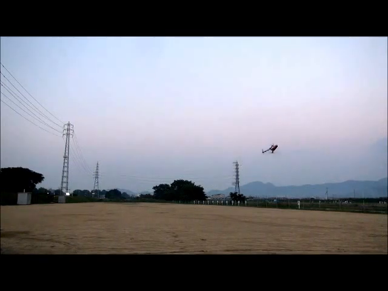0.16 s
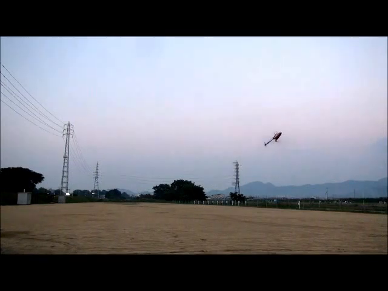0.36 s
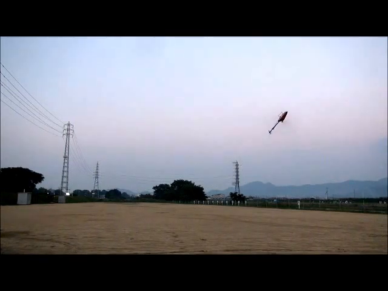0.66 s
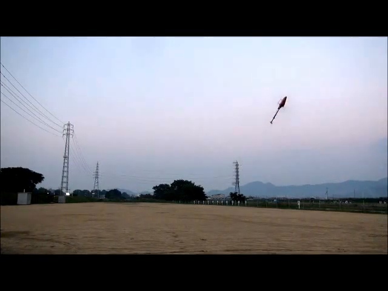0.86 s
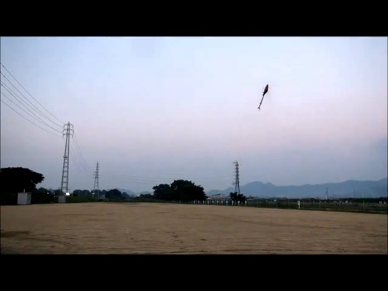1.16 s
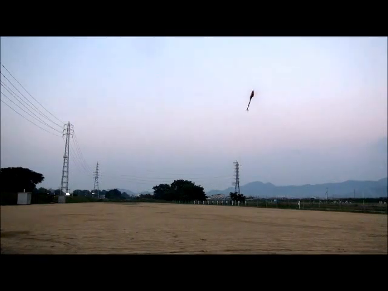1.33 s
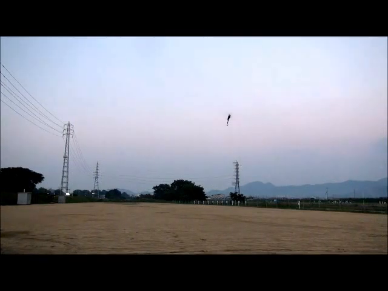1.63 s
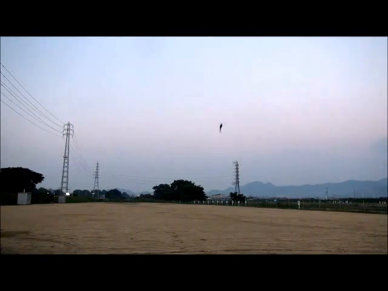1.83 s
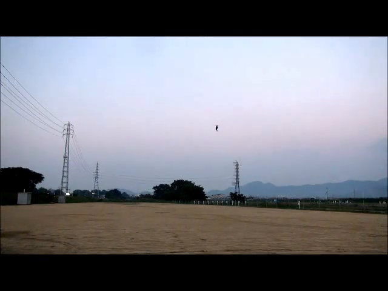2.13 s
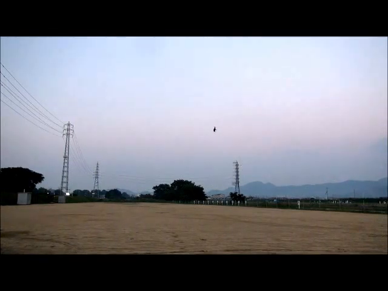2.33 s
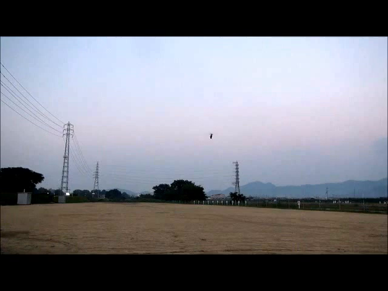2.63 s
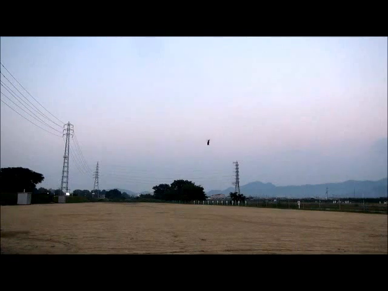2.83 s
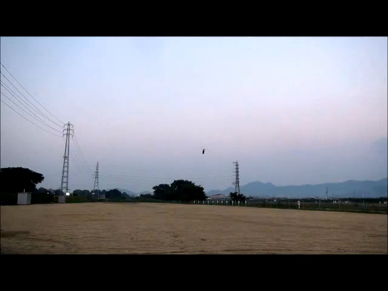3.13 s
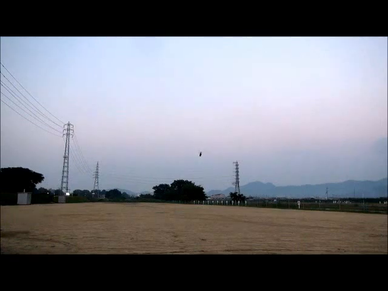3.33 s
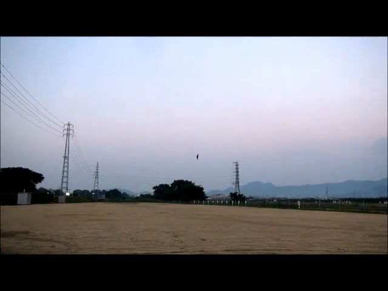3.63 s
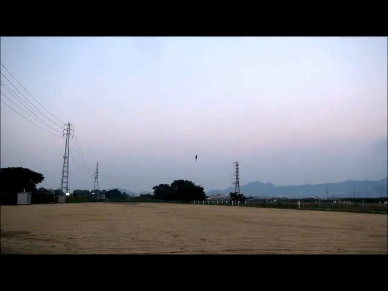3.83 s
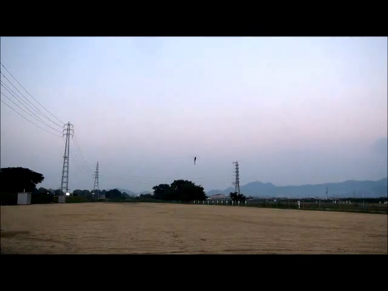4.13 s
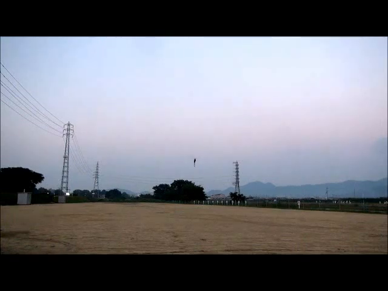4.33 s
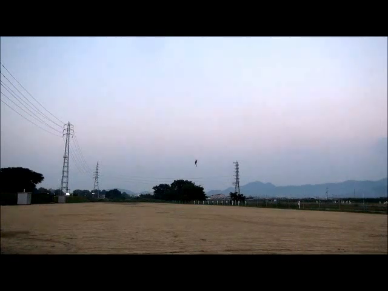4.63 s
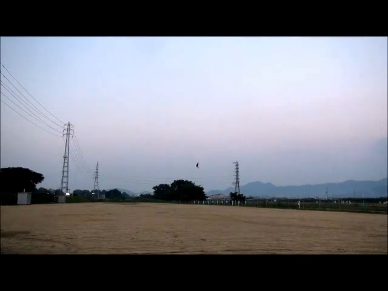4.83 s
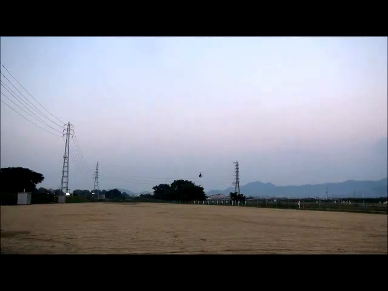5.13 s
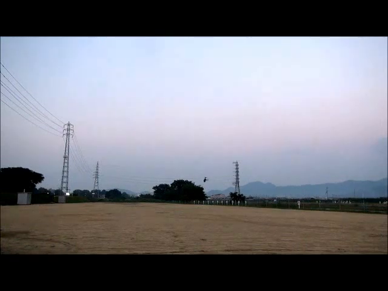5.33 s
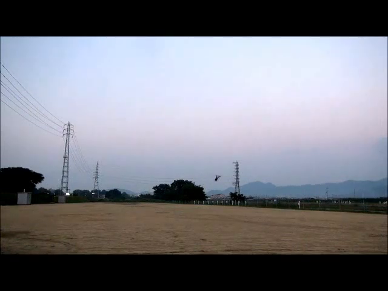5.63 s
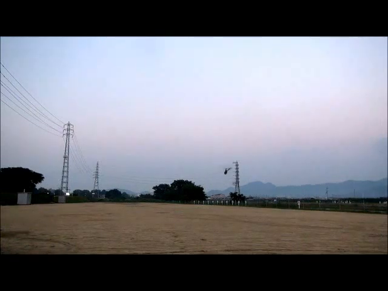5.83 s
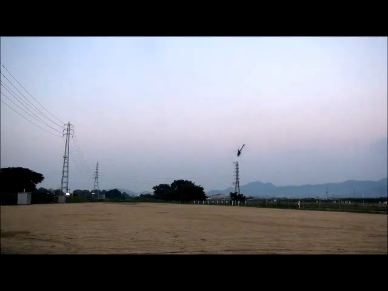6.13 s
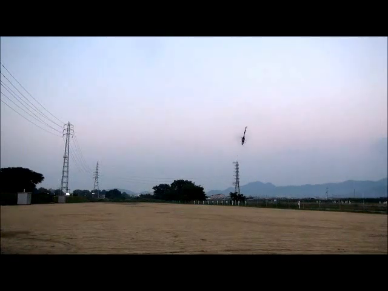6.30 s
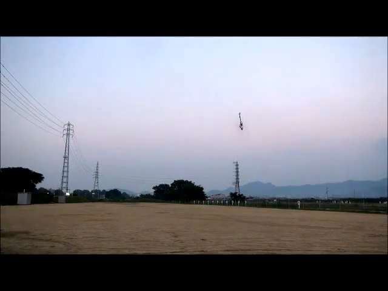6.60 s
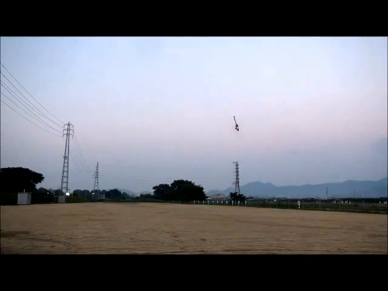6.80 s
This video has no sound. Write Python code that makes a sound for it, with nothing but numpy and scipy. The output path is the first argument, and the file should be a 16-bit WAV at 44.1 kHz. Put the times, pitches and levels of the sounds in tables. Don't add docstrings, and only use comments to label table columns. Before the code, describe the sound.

An electric model helicopter loops over an open field, its piercing gear whine swelling and dipping over fast blade buzz, rushing air and crackling slaps.

```python
import sys
import numpy as np
from scipy import signal
from scipy.fft import rfft, irfft
from scipy.io import wavfile
from scipy.ndimage import uniform_filter1d, map_coordinates

SR = 44100
rng = np.random.default_rng(int(sys.argv[2]) if len(sys.argv) > 2 else 0)


def gain_from_db(level_db):
    decades = np.asarray(level_db, float) / 20
    return 10 ** decades


def digitize_waveform(pressure):
    field = np.atleast_2d(pressure).T
    bounded = np.clip(field, -1, 1)
    quanta = np.round(bounded * 32767).astype(np.int16)
    wavfile.write(sys.argv[1], SR, quanta)


N = 306936
TEETH = 150
STEP = 64

# t/s, steady wash level/dB, nearness of the drive/dB,
# brightness/dB (high when the rotor disc faces the ear)
FLIGHT_PATH = [(0, -35.5, -39, 2), (.31, -31.5, -35.5, -3.5), (.95, -33.5, -39.5, 1.5),
               (1.07, -44, -45, -7.5), (1.61, -44, -48, -8.5), (1.82, -49, -41.5, -7),
               (2.3, -41.5, -45.5, 3.5), (2.75, -43.5, -39.5, 13), (3.2, -39, -43, -1),
               (3.45, -40.5, -42, 1), (3.68, -43, -50.5, 4), (3.94, -44, -40.5, 2), (4.38, -31.5, -38, -1),
               (4.75, -42.5, -45.5, -3), (5.6, -40, -39, 7.5), (5.95, -43, -43.5, -1.5),
               (6.39, -31, -37.5, -1), (6.96, -36.5, -44.5, -4)]
# f/Hz, level/dB
SLAP_COLOUR = [(150, -29), (400, -2.5), (800, -4), (1600, -3), (3000, -4.5), (5000, -11.5), (9000, -25),
               (15000, -41.5)]


def evened(x):
    return x / np.sqrt(np.mean(x ** 2) + 1e-20)


def columns(table):
    s, *values = np.transpose(table)
    return [np.interp(np.arange(N) / SR, s, v) for v in values]


def fine(slow):
    return np.interp(np.arange(N) / STEP, np.arange(len(slow)), slow)


def colour(x, points):
    hz, db = np.transpose(points)
    log_hz = np.log(np.fft.rfftfreq(N, 1 / SR) + 1)
    gain = gain_from_db(np.interp(log_hz, np.log(hz), db))
    return irfft(rfft(x) * gain, N)


def drift(per_s):
    knots = rng.standard_normal(int(N / SR * per_s) + 3)
    return np.interp(np.arange(N) / SR * per_s, np.arange(len(knots)), knots)


def beam(s, db, rise, fall=None, shape=1.15):
    t = np.arange(0, N + STEP, STEP) / SR - s
    away = np.where(t < 0, -t / abs(rise), t / abs(fall or rise))
    return gain_from_db(2 * (db - 10 * away ** shape))


def levels(lines, rest_db, shape=1.15):
    curves = []
    for rows, db in zip(lines, rest_db):
        power = gain_from_db(2 * db) + sum(beam(*row, shape=shape) for row in rows)
        curves.append(fine(10 * np.log10(power)))
    return curves


def tones(turns, levels_db, orders, under_db, fade_db, flutter_db):
    out = np.zeros(N)
    for level_db, group, group_db in zip(levels_db, orders, under_db):
        for k, (order, db) in enumerate(zip(group, group_db)):
            fading = fade_db * np.minimum(drift(6), 0.6) * (k > 0)
            fading = fading + flutter_db * drift(45)
            tone = np.cos(2 * np.pi * (order * turns + rng.random()))
            out += np.sqrt(2) * gain_from_db(level_db + db + fading) * tone
    return out


def field_murmur():
    # f/Hz, level/dB
    murmur_colour = [(20, -42), (40, -44), (70, -24), (120, 0), (250, -1.5), (400, -8), (800, -12.5),
                     (2000, -23)]
    return gain_from_db(-43) * evened(colour(rng.standard_normal(N), murmur_colour))


def ground(x):
    # t/s, extra delay of the bounce/ms
    bounce_delay = [(0, 1.023), (.2, 1.066), (.8, 1.465), (1.35, 1.785), (1.6, 1.62), (1.95, 1.385),
                    (2.6, 1.32), (3.2, 1.04), (3.4, 0.948), (4.4, 0.861), (4.6, 0.816), (5.0, 0.84),
                    (5.45, 0.63), (6.0, 0.73), (6.4, 1.26), (6.96, 1.47)]
    delay_ms = columns(bounce_delay)[0]
    late = np.arange(N) - delay_ms * SR / 1000
    bounce = map_coordinates(x, [late], order=3)
    soft = colour(bounce, [(500, -2.5), (4000, -6.5), (7000, -13), (11000, -15)])
    treble = colour(bounce, [(3000, -40), (7000, -15), (11000, -15)])
    grazing = np.clip(4 * (1 - delay_ms), 0, 1) * treble
    return (x + grazing + soft) / 1.1423


def hiss(turns):
    # f/Hz, level/dB
    rattle_colour = [(3000, -1.5), (4500, -1.5), (5300, 1.5), (6000, 3.5), (6600, 6), (7200, 4),
                     (8000, 1.5), (9000, -1.5), (10500, -32.5)]
    # f/Hz, level/dB
    tip_colour = [(7500, -12.5), (9000, 0.5), (10500, -0.5), (12000, 0.5), (13200, 1.5), (14200, -7.5),
                  (15000, -12), (16000, -30)]
    rattle_db = columns(FLIGHT_PATH)[1]
    tips_db = rattle_db - 1.5
    throb = 1 + 0.26 * np.cos(4 * np.pi * turns)
    rattle = evened(colour(rng.standard_normal(N), rattle_colour))
    rattle = gain_from_db(rattle_db + 8.5 + 1.42 * drift(10)) * rattle
    tips = evened(colour(rng.standard_normal(N), tip_colour))
    tips = gain_from_db(tips_db + 4.5 + 1.6 * drift(10)) * tips
    return throb * (rattle + tips)


def hums(turns):
    # t/s, peak level/dB, rise/s and fall/s per 10 dB
    thump = [
        [(.38, -27.5, 0.56, 0.58), (.83, -36.5, 0.25, -0.2), (1.6, -38.5, 0.34, 0.4), (1.78, -41, 0.107, 0),
         (2.8, -34.5, 0.41, 0.25), (2.0, -45.5, .15, 0), (2.35, -43.5, .08, 1), (3.4, -50, 0.11, 4),
         (3.82, -40, 0.32, 1), (4.42, -39, 0.34, 0.4), (5.54, -36, 1, 0.5), (6.25, -34, 0.38, 0.4),
         (6.65, -37, 0.11, 0), (6.42, -21, 0.166, 0.1)],
        [(.3, -31.5, 0.82, 0.23), (.71, -40.5, .3, 1), (1.02, -33, 0.14, 0.2), (1.65, -45, 0.15, -0.4),
         (2.02, -38.5, 0.17, 0), (2.4, -38, .15, 0.3), (2.89, -37, 0.58, 0.37), (3.82, -35.5, 0.42, 0.5),
         (4.42, -43.5, 0.17, 1), (5.54, -37, 1.8, 0.4), (6.27, -38, 0.77, 1.5), (6.56, -27.5, 0.137, 0),
         (6.96, -35, .08, 6)],
        [(.2, -37.5, 1.4, 0.16), (.9, -47, 0.33, -1), (2.1, -46, 0.118, 0.2), (2.4, -46, .12, 1),
         (2.89, -47.5, 0.54, 5), (4.7, -42, .1, 0.5), (4.25, -42, 0.48, -0.5), (5.7, -39, 1.55, 0.4),
         (6.36, -42.5, 0.06, -0.2), (6.56, -37.5, 0.07, -0.5)],
    ]
    # t/s, peak level/dB, rise/s and fall/s per 10 dB
    tail = [
        [(0, -45, .9, 1.2), (.78, -40.5, 0.18, -0.06), (1.55, -46, 0.5, -0.5), (2.15, -45.5, 0.29, 0.46),
         (3.5, -47.5, 0.6, .5), (4.25, -41, 0.69, 0.5), (5.54, -40, 1.5, 0.84)],
        [(.33, -39.5, 1.9, .11), (.95, -54, .4, .8), (1.97, -42, .08, .25), (2.4, -45, .2, .3),
         (2.8, -44, .6, 1.1), (4.75, -53, .2, .5), (6.33, -43, .35, .08), (6.58, -52, .1, .3),
         (6.96, -48, .1, .1)],
        [(.47, -39.5, 0.426, 0.44), (.96, -41, 0.1, -0.1), (1.66, -62, 0.085, -2), (2.1, -41, 0.24, 0.36),
         (2.8, -48, 0.56, 0.8), (4.42, -53, 0.112, 0), (6.96, -51.5, .08, .1)],
        [(2.1, -45, 0.1, .05), (6.4, -47.5, 0.13, 2), (6.62, -47, 0.1, .15), (6.82, -43.5, .1, 0.5),
         (6.95, -47, 0.1, .1)],
    ]
    hum_orders = [
        [2],
        [4],
        [6, 3, 8, 10],
        [8.5],
        [17, 25.5],
        [12.5],
        [14, 12, 18, 20, 22],
    ]
    hum_db = [
        [0],
        [0],
        [-0.5, -11.5, -9.5, -13],
        [-0.5],
        [2.5, -12],
        [0],
        [0.92, 0.24, -0.33, -1, -2.2],
    ]
    hum_rest_db = [-54, -52, -62, -58, -62, -64, -70]
    return tones(turns, levels(thump + tail, hum_rest_db), hum_orders, hum_db, 5.4, 1.65)


def gears(turns):
    # t/s, peak level/dB, rise/s and fall/s per 10 dB
    mesh = [
        [(0, -45, .5), (1.1, -48, 0.2), (1.89, -43, 0.15), (2.55, -44, 0.45, 0.5), (2.72, -46, 0.46),
         (3.43, -38, 0.15), (4.08, -41, 0.16), (4.7, -45, .6), (5.46, -46, 0.25), (6.0, -41, 0.6, 0.8)],
        [(0.47, -34, 0.36), (.8, -50, 1.5), (1.2, -39, 0.28), (1.86, -37, 0.2), (2.87, -34, 0.47),
         (3.3, -41.5, -0.6), (4.11, -32.5, 0.26), (4.74, -37.5, .5), (5.6, -33.5, 0.15), (6.13, -33.5, 0.44),
         (6.47, -25, 0.03, -0.2), (6.93, -35, -0.28)],
        [(.4, -37, 1.4), (1.14, -32.5, 0.26), (1.9, -47, 0.7), (3.38, -46, 1.5), (4.05, -45, 0),
         (6.22, -35, 0.5, 0.8), (6.6, -46, .3)],
    ]
    # t/s, peak level/dB, rise/s and fall/s per 10 dB
    drive = [
        [(.4, -44, 0.5), (.75, -38, 0.1), (.92, -43, 0), (1.14, -43, 0), (1.45, -50, 0.3),
         (1.83, -42.5, .08, .2), (2.1, -47, 0.3), (2.85, -46, 0.34), (3.38, -45.5, 0.3), (4.05, -43, 0.3),
         (5.55, -46, 0.3), (6.43, -47.5, .3), (6.71, -35, .07), (6.92, -45, -0.34)],
        [(.6, -39, .2), (.8, -34.5, 0.18), (1.83, -44.5, 0.26), (2.41, -39, -0.2), (4.3, -43, .25),
         (4.97, -40, 0.1), (6.45, -43, .07), (6.65, -40, .1)],
        [(0, -47, 1), (.43, -48.5, 1), (1.08, -38, 0.1), (1.36, -40, .06), (1.83, -44, 0.2), (4.1, -42.5, -0.2),
         (4.83, -39.5, 0.15), (5.98, -47, 0.3), (6.43, -31, .05, .1), (6.7, -34, 0.3)],
        [(.3, -49, .5), (1.07, -42, .08, .1), (3.0, -47, 1), (3.6, -45.5, 0.1), (5.2, -47, 0.35),
         (6.58, -45, 0.08)],
    ]
    gear_orders = [
        [300, 292, 284, 308, 316, 324, 264, 276, 296, 304],
        [158, 154, 156, 152, 166, 160],
        [142, 144, 146, 148],
        [98, 100],
        [196],
        [162.5],
        [132, 134],
    ]
    gear_db = [
        [2, -3.5, -7.5, -8, -7, -14.5, -11.5, -17, -14, -12],
        [-2, -8.5, -7.5, -12, -14.5, -10],
        [-1.5, -17, -13, -8],
        [0, -11],
        [0.5],
        [1.5],
        [0, -5],
    ]
    gear_rest_db = [-57, -52, -50, -52, -56, -57, -60]
    return tones(turns, levels(mesh + drive, gear_rest_db), gear_orders, gear_db, 7.0, 3.5)


def whine(turns):
    # t/s, peak level/dB, rise/s and fall/s per 10 dB
    whine_beams = [
        [(.12, -26.5, .4, .2), (.39, -24.5, .1, .07), (.565, -21.5, .075, .045), (.715, -20, .075, .07),
         (.87, -19.5, .065, .11), (1.07, -26.5, .07, .05), (1.33, -25, .06, .05), (1.56, -37, .04, .06),
         (1.715, -25, .04, .055), (1.91, -27.5, .17, .03), (2.06, -37, .3, .35), (2.14, -33, .03, .15),
         (2.25, -30, .02, .34), (2.76, -19.5, .122, .06), (2.99, -21, .09, .22), (3.44, -21.5, .2, .12),
         (3.73, -29, .08, .14), (4.05, -25.5, .2, .13), (4.52, -35, .12, .2), (5.12, -23.5, .17, .36),
         (5.61, -19.5, .106, .6), (6.21, -26, .03, .1), (6.36, -28, .1, .04), (6.56, -30.5, .3, .065),
         (6.76, -26, .045, .1)],
    ]
    whine_rest_db = [-52]
    neighbours = [
        [149, 151, 148, 153, 147, 155, 145],
    ]
    neighbours_db = [
        [0, 0, -1, -2, -2, -3, -3],
    ]
    near_db = columns(FLIGHT_PATH)[1] - 6.5
    comb = tones(turns, [near_db], neighbours, neighbours_db, 5.5, 1.9)
    main_db = levels(whine_beams, whine_rest_db, 1.7)
    return comb + tones(turns, main_db, [[TEETH]], [[0]], 0, 1.0)


def air():
    # t/s, peak level/dB, rise/s and fall/s per 10 dB, clean click share 0-1
    slap_bursts = [(.56, -34.5, 0.081, 0.3, 0.5), (.78, -29.5, 0.19, 0.3, 0.18),
                   (.95, -24.5, 0.098, 0.05, 0.8), (1.02, -24, .08, .045, .92),
                   (1.1, -29.5, 0.058, 0.1, 0.7), (1.26, -33.5, 0.18, 0.1, 0.98),
                   (1.5, -34, 0.3, 0.54, 0.94), (1.94, -26, 0.031, 0.26, 0.18),
                   (2.09, -26.5, 0.083, 0.12, 0.36), (2.19, -29, 0.11, 0.19, 0.44),
                   (2.78, -32.5, 0.15, 0.19, 0.36), (2.96, -29.5, 0.17, 0.27, 0.26),
                   (3.208, -32, 0.03, 0.09, 0.8), (3.325, -35, 0.043, 0.16, 0.6),
                   (4.39, -27, 0.16, -0.12, 0.18), (4.46, -27.5, .025, 0.02, 1),
                   (4.53, -27, 0.062, 0.09, 0.96), (4.66, -28.5, 0.29, 0.12, 0.8),
                   (4.9, -39.5, 0.06, 0.5, 0.7), (5.38, -32, 0.1, 0, 0.1), (5.6, -30.5, 0.037, .4, 0.78),
                   (5.87, -48, 0.23, 0, 0.58), (6.58, -25.5, 0.23, 0.36, 0.63), (6.8, -30, 0.089, 0, 0.94),
                   (6.96, -24, 0.12, 2, 0.75)]
    wash_db, _, bright_db = columns(FLIGHT_PATH)
    bursts = np.array([beam(*row[:4]) for row in slap_bursts])
    clean = np.clip(np.transpose(slap_bursts)[4], 0, 1)
    total = gain_from_db(2 * wash_db) + fine(bursts.sum(0))
    locked = fine((1 - np.exp(-clean / 0.24)) @ bursts) / total
    clean_share = fine(clean @ bursts / (bursts.sum(0) + 1e-20))
    return 10 * np.log10(total), locked, bright_db, clean_share


def passes(turns):
    # t/s, level over their neighbours/dB, treble lean/dB
    hard = [(0.489, 13, 2), (0.557, 7, 6), (0.568, 3.2, 4), (0.909, -1, 8), (0.943, 3.5, -3), (0.955, 1, 4),
            (0.977, 5, -7), (1.026, -0.5, -3), (1.037, 1, 13), (1.097, 3, -1), (1.255, 0.5, -3),
            (1.438, 2.5, -6), (1.657, 5, 3), (1.925, 4, 5), (1.946, 1, -6), (2.018, 4, -10),
            (2.086, 1.5, -11), (2.098, -1, -6), (2.157, 2, -2), (2.18, 2.5, 2), (2.191, 2, -12),
            (2.203, 2.5, -7), (2.271, 3.5, 1), (2.537, 7, 9), (2.674, 2.8, 6), (2.766, 1, 6), (2.902, 2, 0),
            (2.925, 0, 7), (3.029, 1, 3.5), (3.189, 2.5, -6.5), (3.201, 6.5, -1), (3.315, 4.5, -7),
            (3.326, 4, 0), (4.381, 2, -8.5), (4.449, 3, -10), (4.46, 3, -7), (4.471, 4, 4), (4.505, 3, 4),
            (4.528, -2, -3.5), (4.538, 1, 0), (4.574, 0.5, 4), (4.595, 2, 9), (4.641, 4.5, 5),
            (4.652, -1, -1), (4.685, 5, 4), (5.585, 3, -8), (5.597, 2.4, -14), (5.607, 1.5, -8),
            (5.88, 2, 2), (5.891, 4.9, -13.5), (6.245, 2.9, -4), (6.382, 5, 1), (6.517, 4, -2),
            (6.637, 1.9, -3), (6.77, 4, 3), (6.782, 2.5, 0), (6.84, 2.5, 5.5), (6.924, 1.3, 2),
            (6.947, 1, -4), (6.959, 0, -5)]
    # t/s, level against their neighbours/dB
    soft = [(0.92, -5), (1.049, -5), (1.062, -1), (1.073, -4), (1.206, 1.5), (1.218, -3), (1.23, -1),
            (1.291, -2), (1.414, 1), (1.476, -2.4), (2.027, -0.8), (2.037, 0), (2.121, -4), (2.133, -3),
            (2.145, -1.7), (2.167, -6), (2.742, -5), (2.8, 1), (3.166, -3.3), (3.177, -2), (4.437, -1),
            (4.482, -4.0), (4.493, -7), (4.549, -0.7), (4.561, -3), (4.607, -4.5), (4.618, -1), (4.664, -6),
            (4.674, 0), (4.731, -2.1), (5.654, -7), (5.676, -8), (5.846, -2), (6.866, -4), (6.888, 1),
            (6.912, -2.5)]
    # t/s, lateness of the slap (share of a pass)
    wake = [(0, .5), (.55, .4), (.86, .3), (.91, .06), (1.8, .09), (1.9, .56), (2.4, .55), (2.7, .5),
            (3.06, .56), (3.14, .68), (4.3, .77), (4.76, .75), (4.85, .96), (5.2, .78), (5.7, .81),
            (5.85, .94), (6.35, 1.03), (6.5, 1.46), (6.96, 1.44)]
    at = np.flatnonzero(np.diff(np.floor(2 * turns - .27 - columns(wake)[0])) > 0)
    size, late, lean = np.clip(rng.standard_normal((len(at), 3)).T, -2, 2)
    size_db, lean_db = 0.89 * size - .6, 1.1 * lean
    for s, db, *tilt_db in hard + soft:
        k = np.argmin(abs(at / SR - s))
        size_db[k], lean_db[k] = db, sum(tilt_db)
    at = np.clip(at + (late * 2.2).astype(int), 0, N - 1)
    return at, size_db, lean_db


def smeared(x):
    lead_s, lead_hz = 0.00218, 4465
    hz = np.fft.rfftfreq(N, 1 / SR)
    return irfft(rfft(x) * np.exp(1j * np.pi * lead_s * hz ** 2 / lead_hz), N)


def blades(turns):
    # f/Hz, level/dB
    wash_colour = [(150, -8), (400, 1.5), (800, -3.5), (1600, -1.5), (3000, -4), (4500, -2.5), (6000, -33),
                   (9000, -41.5)]
    # f/Hz, level/dB
    crackle_colour = [(5000, -25), (6500, 0), (9000, -3), (13000, -20)]
    # t/s, share of the slap in one sharp spike (over 0 a push, under 0 a suction)
    spike_share = [(.97, 0), (.99, 1), (1.04, 1), (1.06, -1), (1.85, -1), (1.9, 0), (6.4, 0), (6.48, -1),
                   (6.68, -1), (6.74, 0)]
    level_db, throb, bright_db, clean = air()
    at, size_db, lean_db = passes(turns)
    clicks = np.zeros(N)
    clicks[at] = -gain_from_db(size_db)

    build_up = signal.windows.exponential(300, 299, 60, False)
    swell = signal.oaconvolve(-clicks, build_up)[299:]
    torn = swell * rng.standard_normal(N)
    puffs = evened(colour(torn, SLAP_COLOUR)) + gain_from_db(-17) * evened(colour(torn, crackle_colour))

    spike = columns(spike_share)[0]
    spread = smeared(clicks * np.sqrt(1 - spike ** 2))
    crack = evened(colour(spread - spike * clicks, SLAP_COLOUR))
    clean = np.clip(clean, 0, 1)
    slap = np.sqrt(clean) * crack + np.sqrt(1 - .9 * clean) * puffs

    gusts = rng.standard_normal(N) * gain_from_db(1.5 * drift(25))
    wash = evened(colour(gusts, wash_colour))
    share = np.clip(throb, 0, .95)
    both = np.sqrt(share) * slap + np.sqrt(1 - share) * wash

    bright_db = bright_db + share * np.interp(np.arange(N), at, lean_db)
    low = colour(both, [(1100, 0), (2200, -30)])
    high = both - low
    return gain_from_db(level_db - 1.0) * (gain_from_db(-bright_db / 2) * low + gain_from_db(bright_db / 2) * high)


def rotor():
    spin = [(0, 6682), (.24, 6672), (.48, 6622), (.72, 6603), (.87, 6555), (1.1, 6205), (1.3, 6118),
            (1.68, 6222), (1.88, 6420), (2.02, 6445), (2.1, 6505), (2.19, 6445), (2.3, 6495), (2.76, 6566),
            (3.14, 6583), (3.46, 6537), (3.84, 6523), (4.26, 6585), (4.33, 6640), (4.4, 6585), (4.5, 6628),
            (4.7, 6627), (5.1, 6691), (5.28, 6708), (5.75, 6653), (6.05, 6596), (6.3, 6560), (6.45, 6420),
            (6.66, 6190), (6.78, 6250), (6.96, 6385)]
    inertia_s = 0.07
    mesh_hz = uniform_filter1d(columns(spin)[0], round(inertia_s * SR), mode="nearest")
    turns = np.cumsum(mesh_hz) / SR / TEETH
    return turns + 0.0006 * uniform_filter1d(drift(14), 2000)


def two_ports(mid):
    # t/s, left minus right/dB, difference between the ports/dB
    pan = [(0, 0.5, 2), (1.2, -0.5, 4.5), (2, 0, -2), (3.8, 0, -2), (5.5, 0, -5), (6.3, 0.1, 1.5),
           (6.96, 0, -3.5)]
    # f/Hz, level/dB
    side_colour = [(30, -2), (100, -39), (400, -22), (900, -39.5), (2800, -23.5), (4300, -28.5),
                   (6500, -23.5), (9000, -25), (12000, -33)]
    pan_db, apart_db = columns(pan)
    side = gain_from_db(apart_db + 5.1 * drift(18)) * colour(np.roll(mid, 97), side_colour)
    return np.array([mid * gain_from_db(pan_db / 2) + side, mid * gain_from_db(-pan_db / 2) - side])


def scene():
    turns = rotor()
    noises = ground(blades(turns) + hiss(turns))
    return two_ports(whine(turns) + gears(turns) + hums(turns) + noises + field_murmur())


def roll_off(x):
    return signal.sosfilt(signal.butter(12, 15780, fs=SR, output="sos"), x)


def record(dry):
    # f/Hz, level/dB
    bass_cut = [(20, -15), (40, -6.5), (60, -1.5), (80, 0)]
    ceiling = 0.37
    heard = np.array([colour(x, bass_cut) for x in dry])
    heard = ceiling * np.tanh(heard / ceiling)
    return roll_off(heard)


dry = scene()
out = record(dry)
digitize_waveform(out)
```